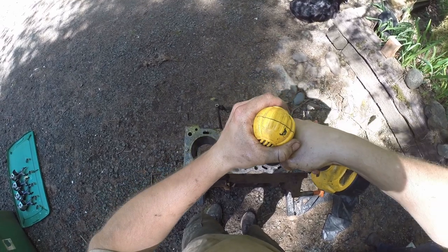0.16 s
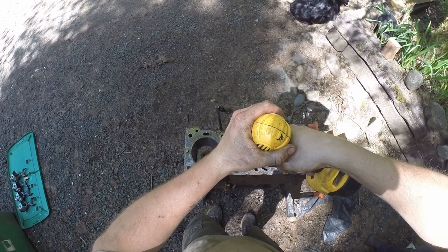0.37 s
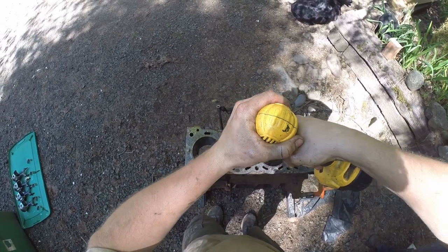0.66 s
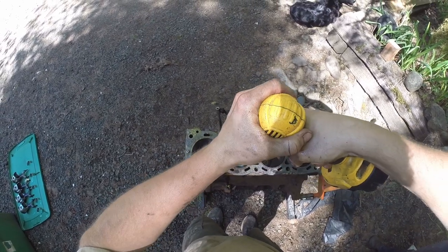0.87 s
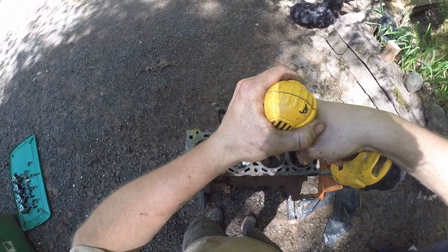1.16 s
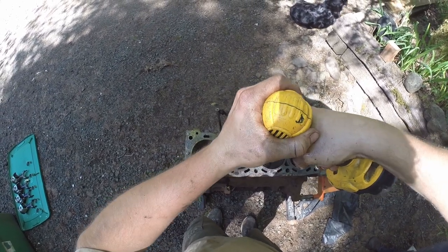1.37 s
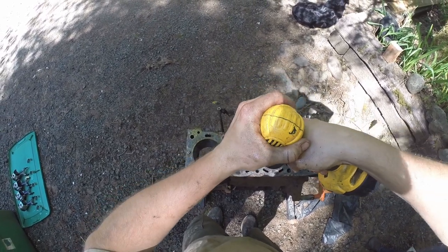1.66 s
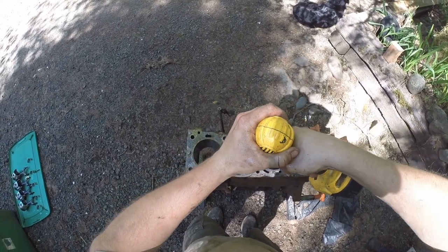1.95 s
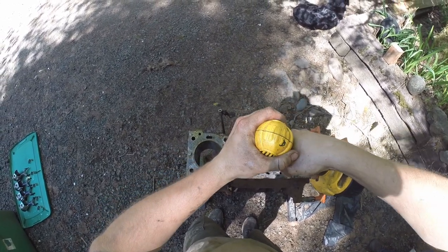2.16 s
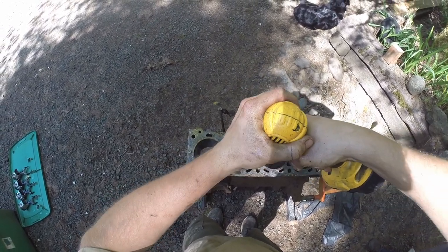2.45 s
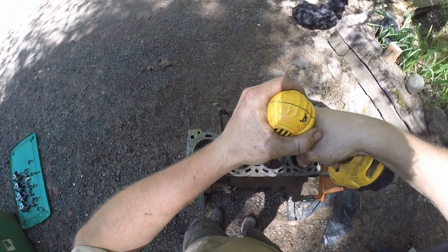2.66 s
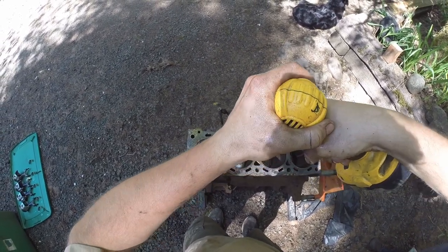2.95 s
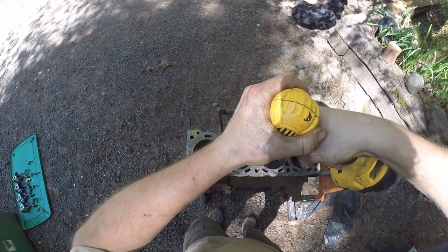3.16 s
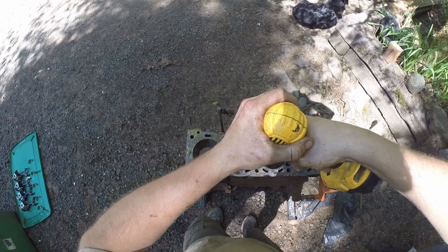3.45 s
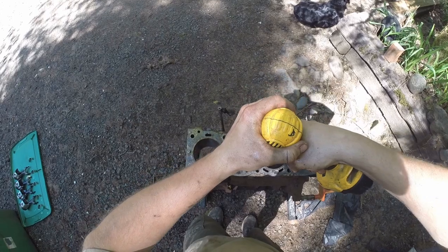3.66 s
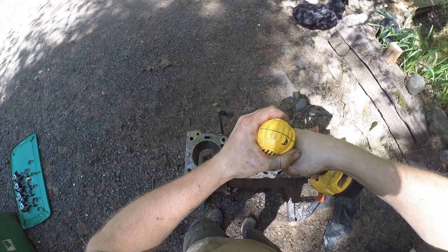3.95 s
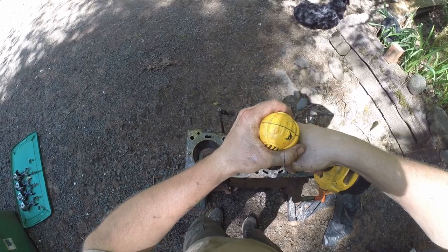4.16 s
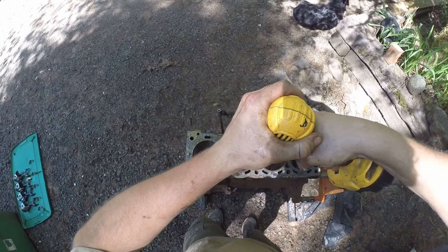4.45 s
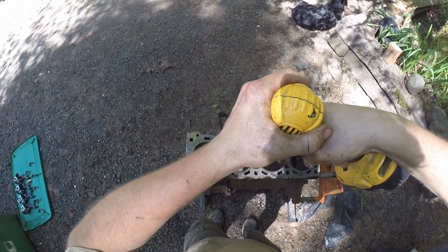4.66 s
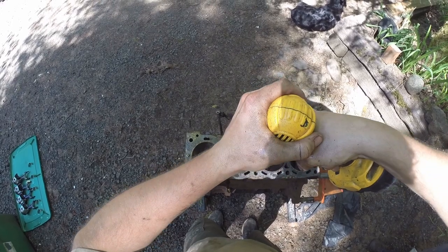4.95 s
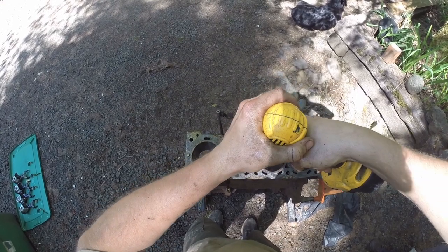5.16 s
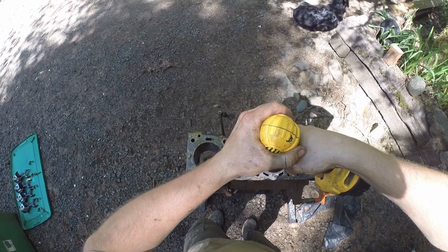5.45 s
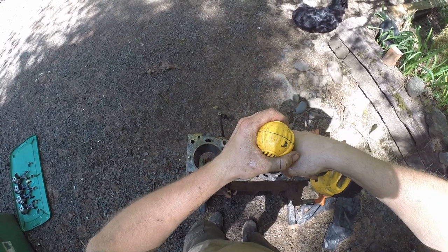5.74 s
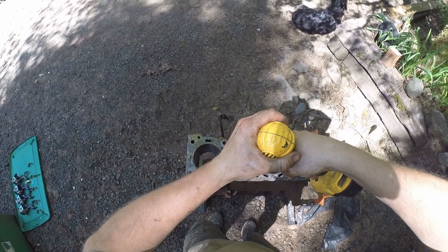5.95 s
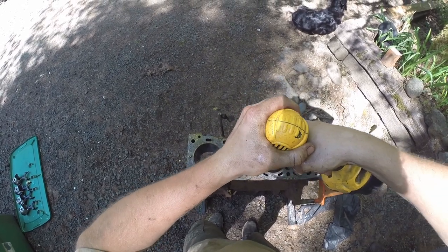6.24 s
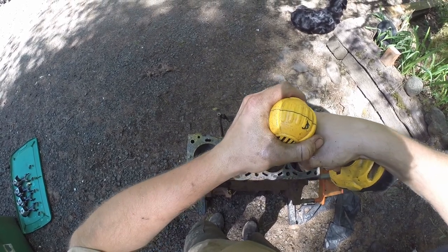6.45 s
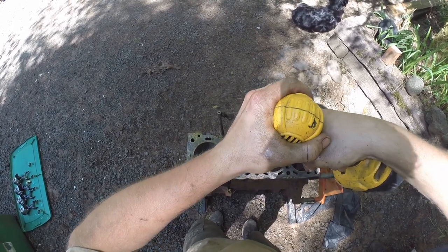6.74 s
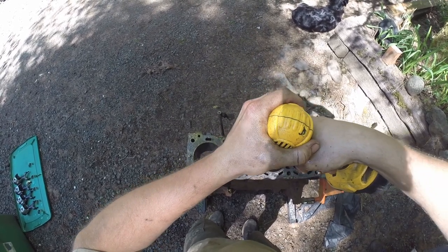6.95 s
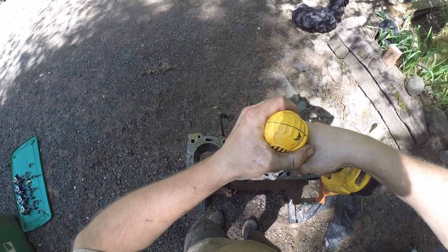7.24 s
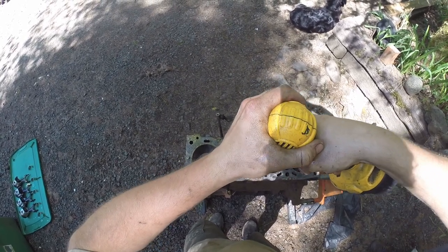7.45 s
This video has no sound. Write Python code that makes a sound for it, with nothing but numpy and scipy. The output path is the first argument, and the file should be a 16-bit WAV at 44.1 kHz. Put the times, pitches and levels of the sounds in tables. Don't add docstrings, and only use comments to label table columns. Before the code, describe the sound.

A cordless drill whines and sags while its abrasive stones rasp inside an iron cylinder, squealing in bursts, with metal arms briefly clacking on the rim.

```python
import sys
import numpy as np
from scipy import signal
from scipy.fft import rfft, irfft, next_fast_len
from scipy.io import wavfile
from scipy.ndimage import uniform_filter1d, map_coordinates

SR = 44100
rng = np.random.default_rng(int(sys.argv[2]) if len(sys.argv) > 2 else 0)


def boost(x):
    u = np.asarray(x, float) / 20
    return 10 ** u


def store_wav(level_fs):
    pcm = np.round(np.clip(np.atleast_2d(level_fs), -1, 1) * 32767)
    wavfile.write(sys.argv[1], SR, pcm.T.astype(np.int16))


N = 335601
USUAL_HZ = 220


def unit(x):
    return x / np.sqrt(np.mean(x ** 2) + 1e-20)


def curves(rows):
    s, *cols = np.transpose(rows)
    return [np.interp(np.arange(N) / SR, s, c) for c in cols]


def wobble(rate):
    knots = rng.standard_normal(int(N * rate / SR) + 4)
    return map_coordinates(knots, [np.arange(N) * rate / SR])


def coloured(x, response):
    m = next_fast_len(N + 8192)
    return irfft(rfft(x, m) * response(np.fft.rfftfreq(m, 1 / SR)), m)[:N]


def spectrum(points):
    f, db = np.transpose(points)
    return lambda hz: boost(np.interp(np.log(hz + 1), np.log(f), db, left=-120, right=-120))


def resonances(modes):
    return lambda f: sum(boost(db) * (1j * f * w / (c * c - f * f + 1j * f * w)) ** 2 for c, w, db in modes)


def patchy(patchy_db):
    z = signal.stft(rng.standard_normal(N), nperseg=512)[2]
    field = uniform_filter1d(rng.standard_normal(z.shape), size=6, axis=0)
    field = uniform_filter1d(field, size=8, axis=1)
    return signal.istft(z * boost(patchy_db * unit(field)), nperseg=512)[1][:N]


def orders(turns, table, blur, flutter_db, rate):
    out = np.zeros(N)
    for k, db in table:
        level = np.sqrt(2) * boost(db + flutter_db * wobble(rate))
        out += level * np.sin(2 * np.pi * k * turns + blur * wobble(rate))
    return out


def breeze():
    # time in seconds, swell in dB, half length in seconds.
    gusts = [
        (1.652, 2, .1),
        (2.27, 4, 0.18),
        (3.35, 3, 0.17),
        (5.518, 10, .06),
        (6.46, 4, .04),
        (6.91, 6, 0.074),
    ]
    t = np.arange(N) / SR
    level_db = -59 + 3 * wobble(8)
    level_db += sum(db * np.exp(-((t - s) / half) ** 2) for s, db, half in gusts)
    return boost(level_db) * unit(coloured(rng.standard_normal(N), resonances([(46.0, 58, 0)])))


def hand():
    # time in seconds, pressure in dB.
    pressing = [(0, -0.5), (.6, 0.5), (1.3, 2), (2.1, -0.1), (2.2, 0.5), (2.3, -.5), (3.1, 0.5), (4, -.5),
                (5, 0.5), (5.9, -1.1), (6.6, 1), (7.61, 1.1)]
    return curves(pressing)[0], wobble(22)


def clacks():
    # time in seconds, peak in dB, thud in dB, crack in dB.
    snaps = [
        (2.1198, 4, -14.5, -16.5),
        (2.126, -24, -24, -22),
        (2.1377, -8.5, -31, -6.5),
        (2.1455, -13, -32, -4),
        (2.1692, -13, -34, -10),
        (2.178, -8, -30, -14),
        (2.2217, -10, -25, -13),
        (2.2426, -5, -35, -20),
        (2.7127, -13, -29, -24),
        (5.9887, -7, -12, -24),
    ]
    # frequency in Hz, level in dB, 60 dB decay in seconds.
    steel = [(2770, -12, .03), (3725, -5, .03), (4700, -12, .03), (5437, 0, .045), (8100, -16, .03)]
    out, t = np.zeros(N + SR), np.arange(SR // 8) / SR
    for s, db, thud_db, crack_db in snaps:
        ring = np.zeros(len(t))
        for hz, level, t60 in steel:
            decay = boost(level + rng.normal(0, 2.5) - 60 * t / t60)
            ring += decay * np.sin(2 * np.pi * hz * t + rng.uniform(0, 6))
        steps = np.repeat(rng.standard_normal(len(t) // 64 + 1), 64)[:len(t)]
        rattle = boost(2 * steps - 60 * t / .06)
        crack = boost(crack_db + 16.5) * rattle * rng.standard_normal(len(t))
        body = np.sin(2 * np.pi * 690 * t) + 0.8 * np.sin(2 * np.pi * 480 * t)
        thud = boost(thud_db + 8.5 - 60 * t / 0.04) * body
        onset = 1 - np.exp(-t / .0012)
        out[round(s * SR):][:len(t)] += boost(db - 11) * (.8 * ring + crack + thud) * onset
    return coloured(out[:N], lambda hz: hz / (hz + 500) / (1 + (hz / 7500) ** 5))


def bore_ring(hz, press_db, shake):
    # frequency in Hz, width in Hz, level in dB.
    wall = [(3846, 360, 6), (4057, 220, -2), (3500, 180, -10), (3710, 46, 4)]
    level_db = -37.5 - .01 * (hz - USUAL_HZ) + 1.1 * press_db + 1.2 * wobble(9) + 0.55 * shake
    return boost(level_db) * unit(coloured(patchy(1.5) * boost(.8 * wobble(60)), resonances(wall)))


def stone_rasp(turns, hz, press_db, shake):
    # frequency in Hz, level in dB per Hz.
    grit = [(1760, -20.5), (3000, -4.5), (3300, -8), (3600, -2.5), (3800, -4.5), (4290, -7), (4850, -4.5),
            (6400, -10.5), (8500, -10.5), (9210, -15), (11000, -23.5), (15100, -35.5)]
    level_db = -31.5 + 0.04 * (hz - USUAL_HZ) + press_db + 0.16 * shake
    once_a_turn = np.cos(2 * np.pi * turns + 0.67 * wobble(40))
    pulse = boost(1.4 * once_a_turn + 0.89 * wobble(300))
    return boost(level_db) * unit(coloured(pulse * patchy(0.07), spectrum(grit)))


def squeal():
    # start in seconds, end in seconds, pitch in Hz, level in dB.
    spells = [(-0.3, 0.23, 3887, -26.0), (0.215, 0.28, 3886, -29.6), (0.645, 0.705, 4306, -33),
              (0.703, 0.768, 4037, -29.1), (0.83, 0.91, 3889, -30.3), (1.15, 1.21, 3868, -29.4),
              (1.735, 2.055, 3849, -29.1), (2.1, 2.12, 3790, -29), (2.208, 2.274, 3827, -28.0),
              (2.295, 2.585, 3806, -30.4), (2.6, 2.9, 3793, -32.2), (2.993, 3.377, 3950, -22.6),
              (3.432, 3.632, 3826, -33.5), (3.65, 3.695, 3928, -29.6), (3.965, 4.055, 3914, -32.4),
              (4.151, 4.39, 3747, -33.5), (4.41, 4.53, 3731, -39.7), (4.56, 4.72, 3758, -33.5),
              (4.856, 5.54, 3847, -29.7), (5.525, 5.61, 3879, -32.9), (5.75, 5.905, 3803, -36.2),
              (6.06, 6.135, 4369, -35), (6.165, 6.24, 3827, -33.0), (6.26, 6.39, 3879, -33.2),
              (6.56, 6.68, 3824, -35.1), (6.695, 6.975, 3915, -25.3), (6.965, 7.12, 3898, -30.4),
              (7.144, 7.189, 3993, -27.2), (7.224, 7.39, 3829, -33.3), (7.41, 7.555, 3862, -31.1)]
    grip_s, grip_db, climb_hz = .08, 3, 70
    let_go_s, droop_hz = .03, 14
    out = np.zeros(N)
    grit, drift = wobble(150) + .8 * wobble(35), wobble(50)
    for start, end, hz, db in spells:
        length = end - start
        at = slice(max(round((start - .05) * SR), 0), round((end + .05) * SR))
        t = np.arange(N)[at] / SR - start
        slip = np.exp(-np.maximum(t, 0) / grip_s)
        on = ((t > 0) & (t < length)) * 1.
        db = db - grip_db * slip
        loose = np.clip((-25 - db) / 11, .15, 1)
        hz = hz - climb_hz * slip - droop_hz * np.exp(np.minimum(t - length, 0) / let_go_s)
        hz = hz - 130 * (1 - uniform_filter1d(on, size=2600))
        level = uniform_filter1d(on, size=600) * boost(db + 2.3 * loose * grit[at])
        out[at] += level * np.sin(2 * np.pi * np.cumsum(hz + 13 * loose * drift[at]) / SR)
    return np.sqrt(2) * out


def gearbox_hiss(hz):
    # frequency in Hz, width in Hz, level in dB.
    shell = [(2300, 700, -3), (2850, 600, 0), (3200, 500, -2)]
    return boost(-40.5 + 0.13 * (hz - 233.0)) * unit(coloured(patchy(2.0), resonances(shell)))


def motor_roar(hz, press_db, shake):
    # frequency in Hz, level in dB per Hz.
    air = [(47, -54), (80, -12.5), (186, -11.5), (271, -13), (394, -11.5), (428, -6.5), (527, -6.5),
           (778, -3), (984, -4), (1100, 1.5), (2200, -4.5), (2860, -28.5), (4840, -120)]
    level_db = -36.94 + 0.0064 * (hz - USUAL_HZ) + 1.2 * press_db + 0.43 * wobble(6) + 0.9 * shake
    return boost(level_db) * unit(coloured(patchy(1.0), spectrum(air)))


def speed():
    # time in seconds, turns in Hz.
    free = [(0.0, 228.5), (0.536, 250.3), (0.773, 280.0), (0.974, 277.0), (1.444, 248.2), (1.608, 245.5),
            (2.078, 259.6), (2.152, 244.7), (2.295, 252.3), (2.944, 266.5), (3.193, 251.5), (4.409, 238.3),
            (4.834, 239.5), (5.213, 232.0), (5.844, 247.4), (6.171, 314.9), (6.867, 232.4), (7.61, 221.4)]
    # time in seconds, speed lost in Hz, build-up in
    # seconds, release in seconds.
    binds = [
        (0.575, 47.621, 0.081, 0.081),
        (3.372, 37.746, 2.213, 0.264),
        (4.071, 65.477, 0.363, 0.217),
        (5.962, 65.258, 0.159, 0.185),
        (6.17, 12, 0.17, 0.08),
        (7.151, 53.065, 2.165, 0.316),
    ]
    t = np.arange(N) / SR
    drag = np.zeros(N)
    for s, lost, build, release in binds:
        drag += lost * np.exp(-np.abs(t - s) / np.where(t < s, build, release))
    return uniform_filter1d(curves(free)[0] - drag, size=2200)


def imbalance_hum(turns):
    # order count, level in dB re hum.
    low_orders = [(1, -3.5), (2, 0.5), (3, 3), (4, -4), (6, 0.5), (7, -2)]
    return orders(turns, low_orders, blur=0.22, flutter_db=1.0, rate=12)


def fan(turns):
    return orders(turns, [(5, 0)], blur=.3, flutter_db=1.2, rate=25)


def commutator(turns, hz, beat):
    # order count, level in dB re commutator tone.
    bars = [(12, -1), (13, -7.5)]
    blur = .8 + .03 * np.maximum(hz - 215, 0)
    swing = boost(.07 * np.maximum(hz - 225, 0) * beat)
    return swing * orders(turns, bars, blur=blur, flutter_db=3, rate=40)


def sparks(turns, hz):
    # order count, level in dB re commutator tone.
    comb = [(18, -20), (21, -10), (28, -4), (31, 2), (33, -10), (36, -6), (48, -8), (54, -14)]
    k = np.arange(257)
    comb_db = np.interp(k, *np.transpose(comb), left=-120, right=-120)
    size = boost(comb_db + 3 * rng.standard_normal((3, len(k))))
    patterns = irfft(size * np.exp(2j * np.pi * rng.random(size.shape))) * len(k)
    angle = (turns + .006 * wobble(30)) % 1
    blend = np.array([wobble(9) for p in patterns])
    blend /= np.linalg.norm(blend, axis=0) / 1.5
    ticks = np.zeros(N)
    for b, p in zip(blend, patterns):
        ticks += b * np.interp(angle, np.linspace(0, 1, len(p), endpoint=False), p, period=1)
    return boost(-2.5 + .12 * (hz - USUAL_HZ)) * ticks


def gear_mesh(turns, hz, beat):
    # multiple of shaft speed, level in dB.
    teeth = [(25.05, -2), (44, -6), (46, -5.5), (50.2, -1)]
    # multiple of shaft speed, level in dB.
    sidebands = [(22, -6), (23.3, -9), (24, -3), (24.5, -5), (26.2, -12)]
    blur = np.clip((hz - 180) / 22, 1.2, 2.4)
    tones = orders(turns, teeth, blur=blur, flutter_db=2.5, rate=70)
    sides = orders(turns, sidebands, blur=blur, flutter_db=3, rate=70)
    return boost(4 * beat) * (tones + boost(np.minimum(.35 * (hz - 215), 0)) * sides)


def whistle(turns, hz):
    near = (20 * hz - 4030) / 170
    return np.exp(-near ** 2) * orders(turns, [(20, -34)], blur=.8, flutter_db=3, rate=40)


def motor_whine(turns, hz):
    # turns in Hz, imbalance hum in dB, fan tone in dB, commutator tone in dB, gear mesh in dB.
    tones = [(166, -65, -47, -45, -41), (192.6, -62, -46.5, -45.5, -39), (218, -52, -42, -41.5, -43),
             (225.8, -51.5, -43, -39.5, -42), (234.4, -49.5, -36, -42, -37.5),
             (260, -51.5, -32, -39, -41.5), (265.7, -52, -27.5, -43, -34)]
    # frequency in Hz, gain in dB.
    housing = [(100, -6), (200, -3), (260, 4), (680, 0), (790, -5), (1000, 0), (2300, 1), (3200, -2),
               (4200, -9), (4500, -2), (4850, 4), (5200, -2), (5600, 2), (6100, -11), (9300, -8),
               (9900, -23), (11200, -19), (12200, -40)]
    at_hz, *levels = np.transpose(tones)
    hum_db, fan_db, bars_db, mesh_db = [np.interp(hz, at_hz, db) + .8 * wobble(6) for db in levels]
    beat = np.cos(2 * np.pi * turns / 4.4 + .7 * wobble(15))
    mix = boost(hum_db) * imbalance_hum(turns) + boost(fan_db) * fan(turns)
    mix += boost(bars_db) * (commutator(turns, hz, beat) + sparks(turns, hz))
    mix += boost(mesh_db) * gear_mesh(turns, hz, beat) + whistle(turns, hz)
    return coloured(mix, spectrum(housing))


def scene():
    hz = speed()
    turns = np.cumsum(hz) / SR
    press_db, shake = hand()
    mix = breeze() + clacks()
    mix += bore_ring(hz, press_db, shake) + stone_rasp(turns, hz, press_db, shake) + squeal()
    mix += gearbox_hiss(hz) + motor_roar(hz, press_db, shake) + motor_whine(turns, hz)
    return mix[None]


def roll_off(x):
    return signal.sosfilt(signal.butter(12, 15240, fs=SR, output="sos"), x)


def record(dry):
    soft = dry[0] / (1 + np.abs(dry[0] / .45) ** 4) ** (1 / 4)
    return roll_off(soft)


dry = scene()
out = record(dry)
store_wav(out)
```